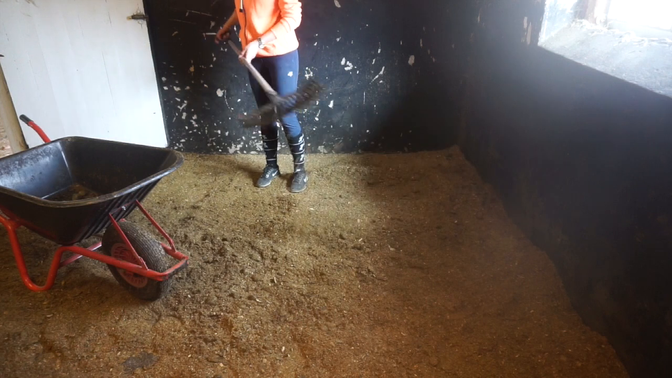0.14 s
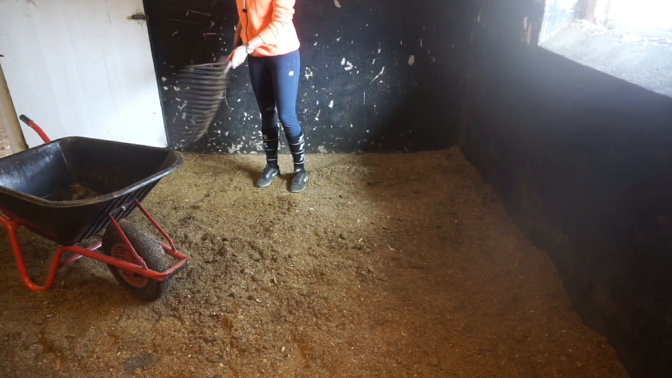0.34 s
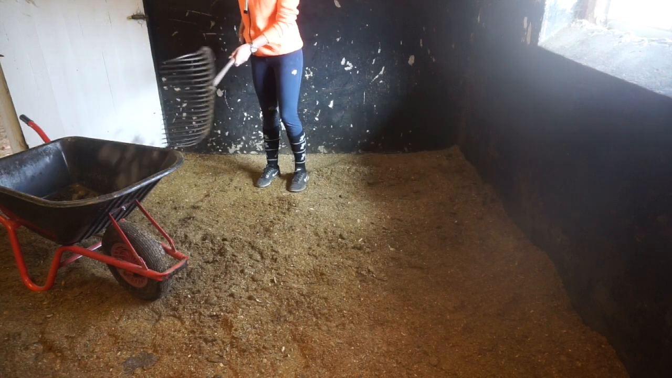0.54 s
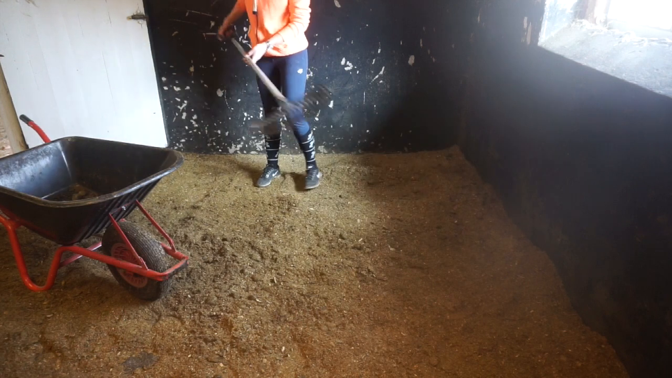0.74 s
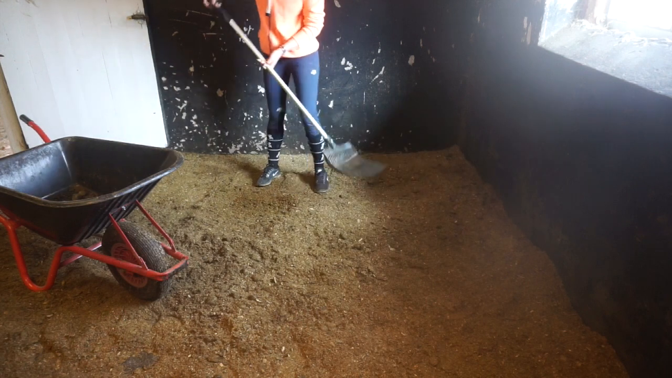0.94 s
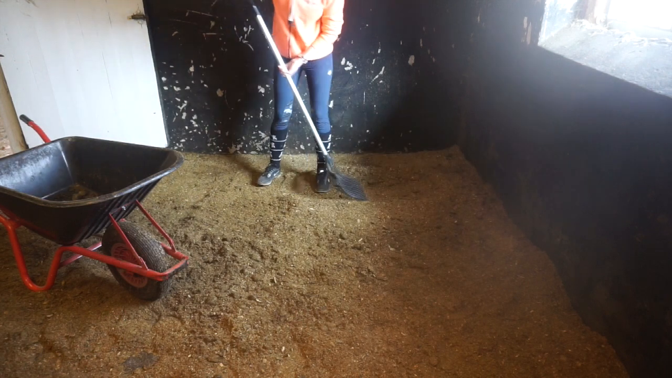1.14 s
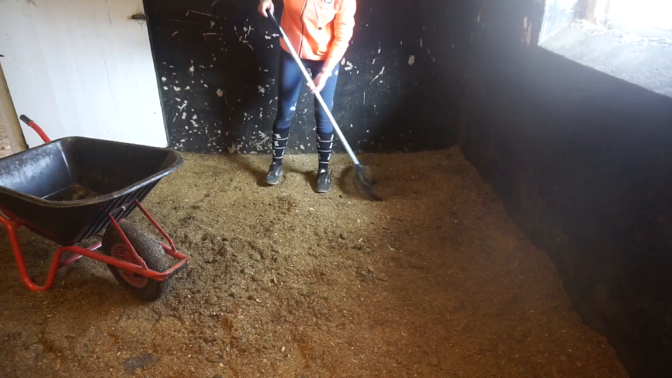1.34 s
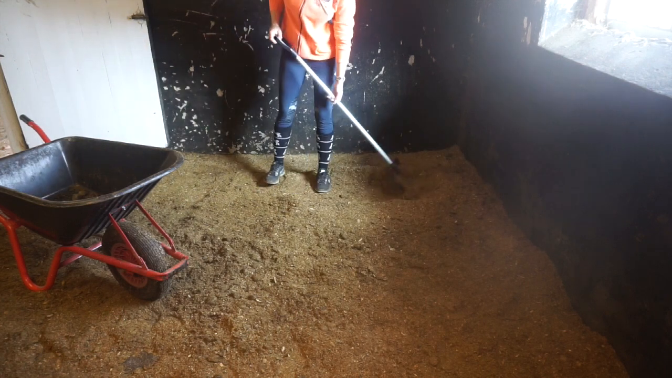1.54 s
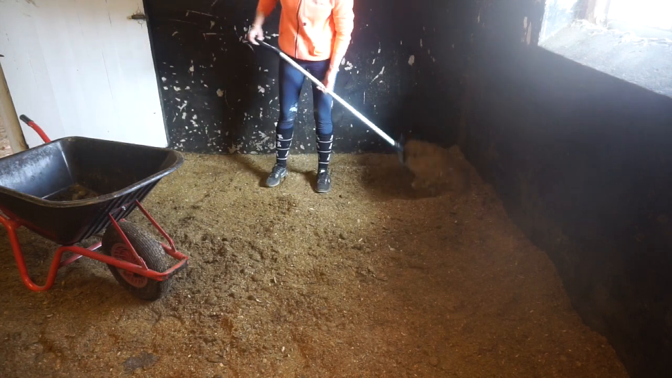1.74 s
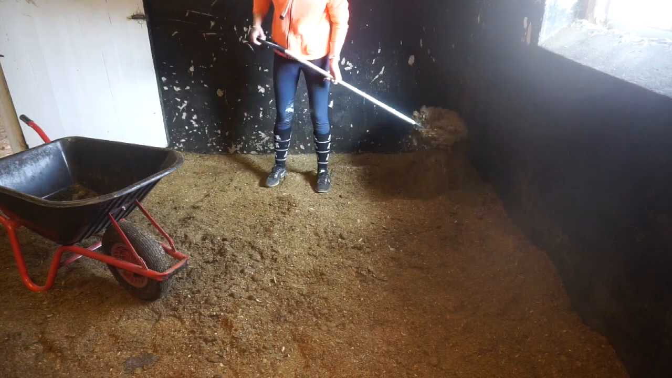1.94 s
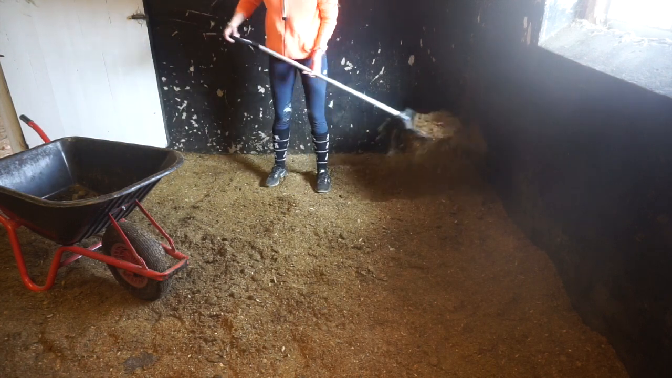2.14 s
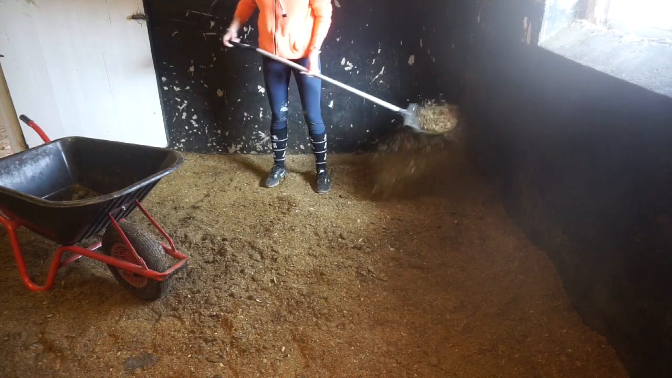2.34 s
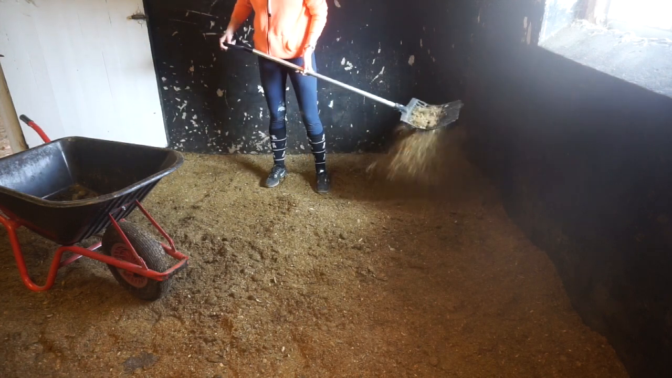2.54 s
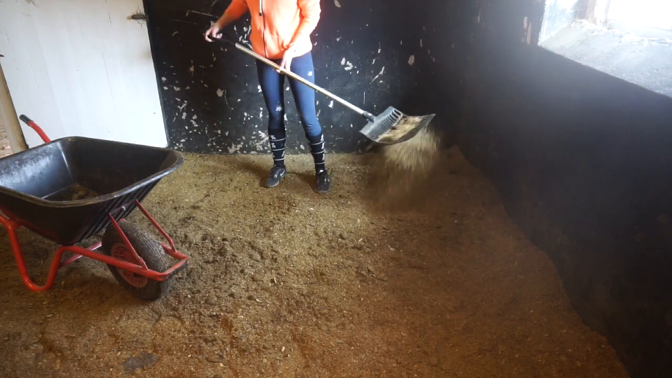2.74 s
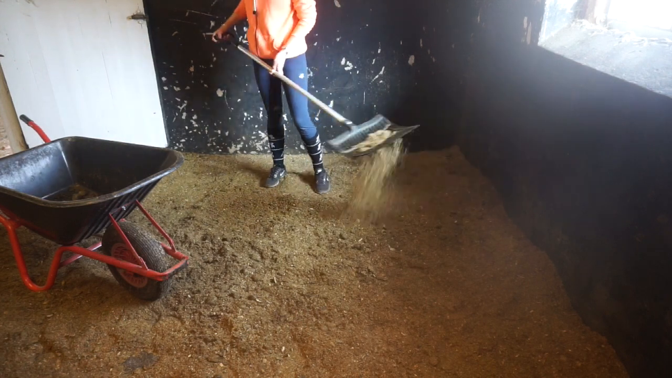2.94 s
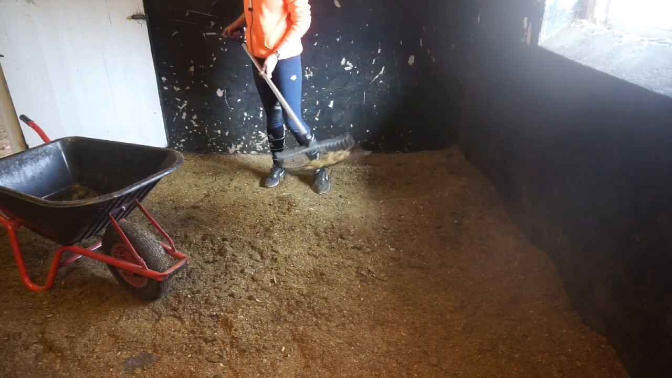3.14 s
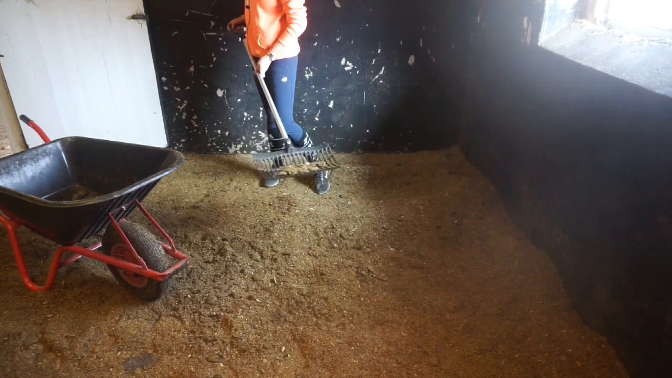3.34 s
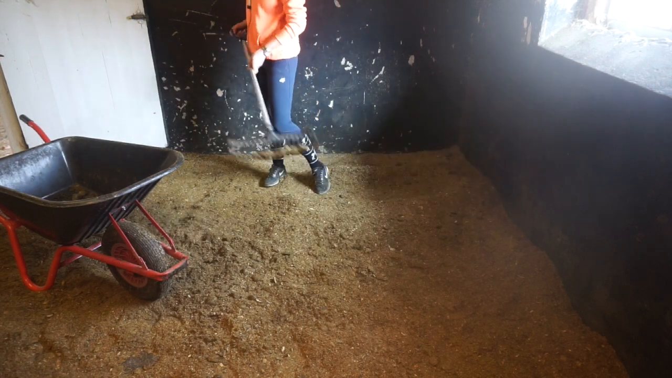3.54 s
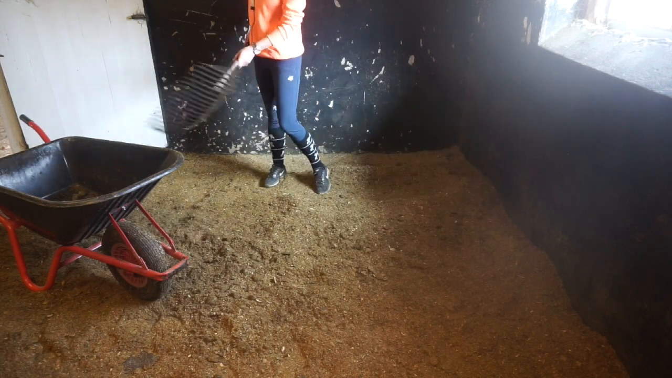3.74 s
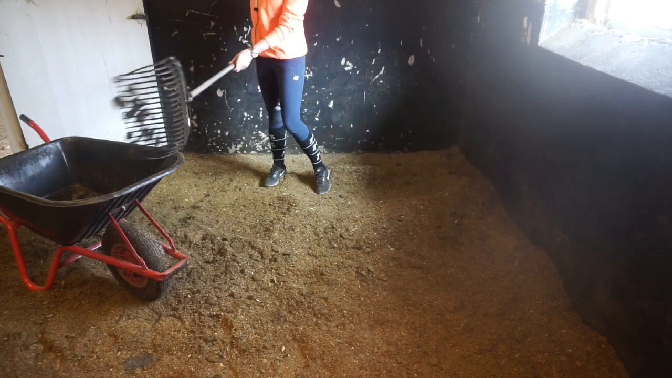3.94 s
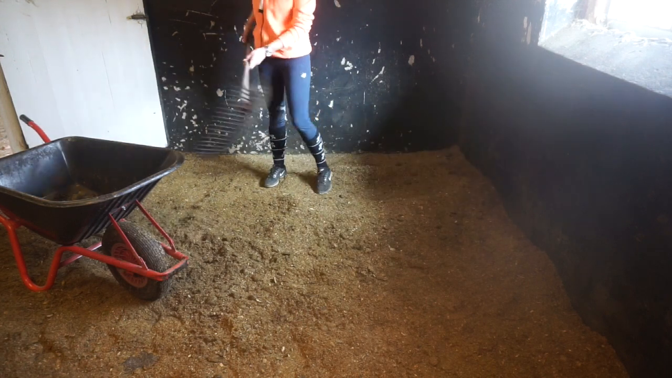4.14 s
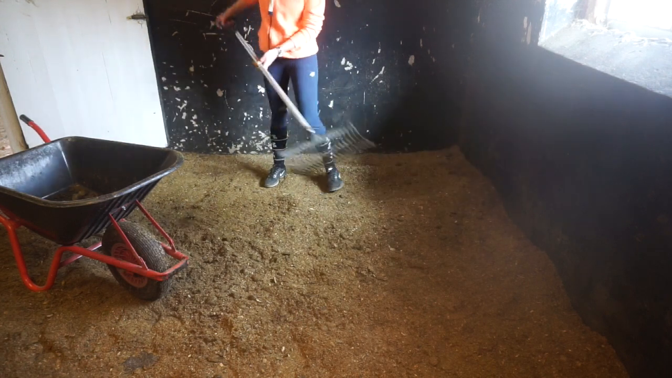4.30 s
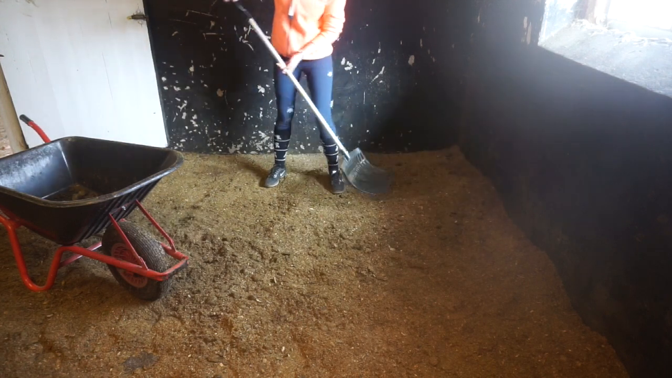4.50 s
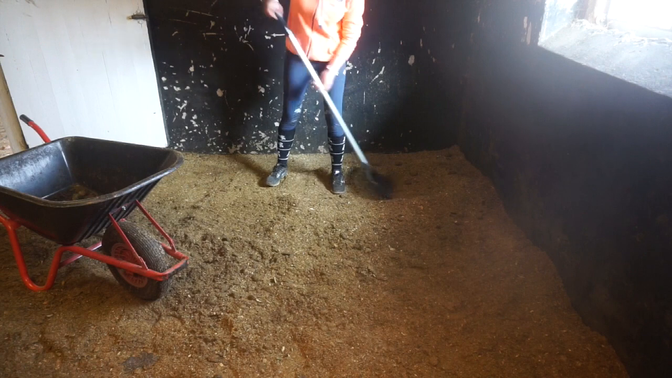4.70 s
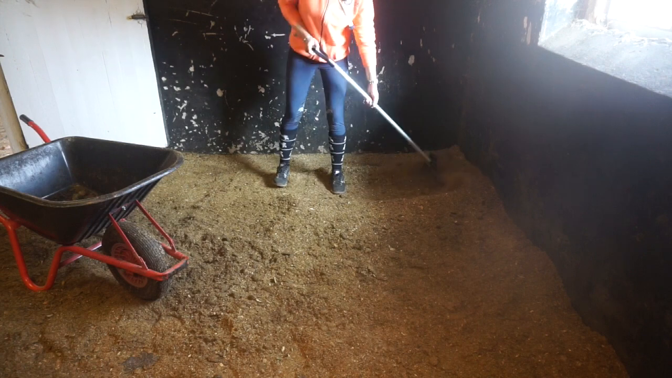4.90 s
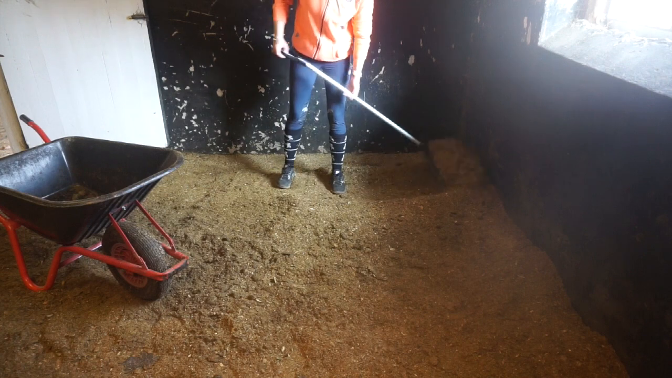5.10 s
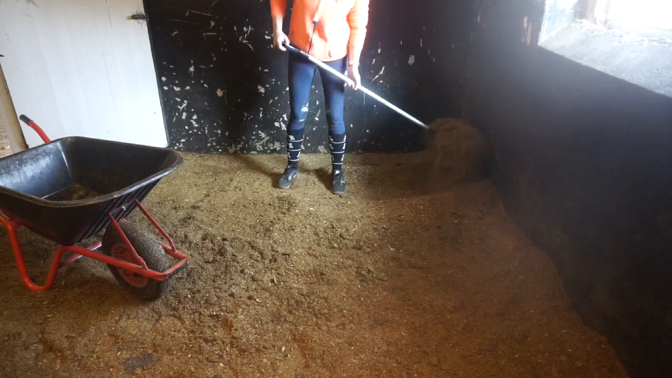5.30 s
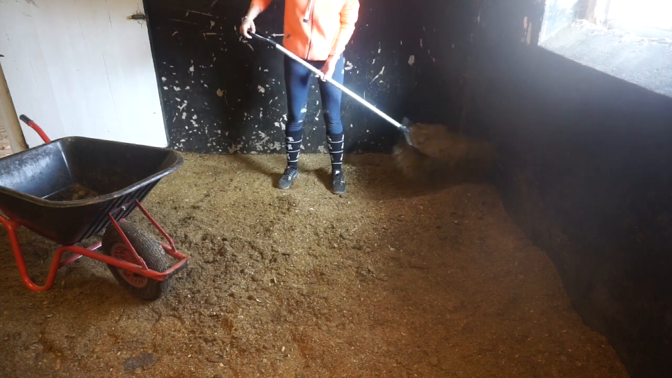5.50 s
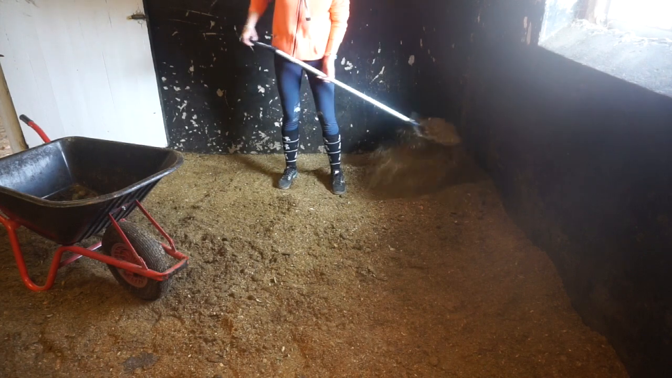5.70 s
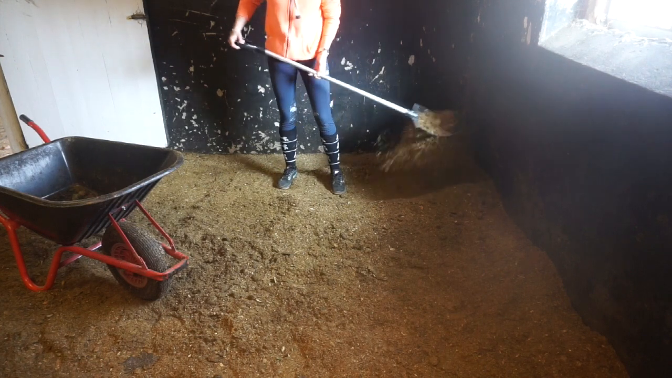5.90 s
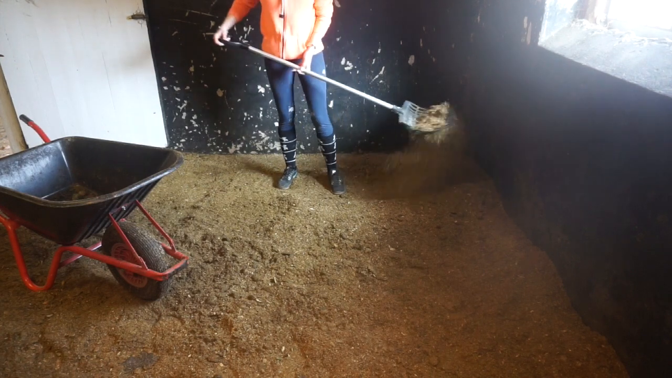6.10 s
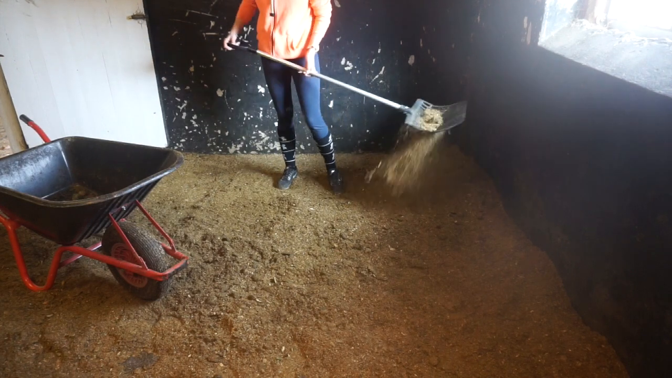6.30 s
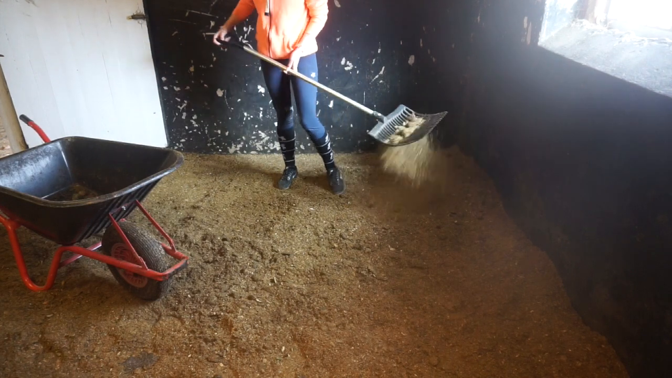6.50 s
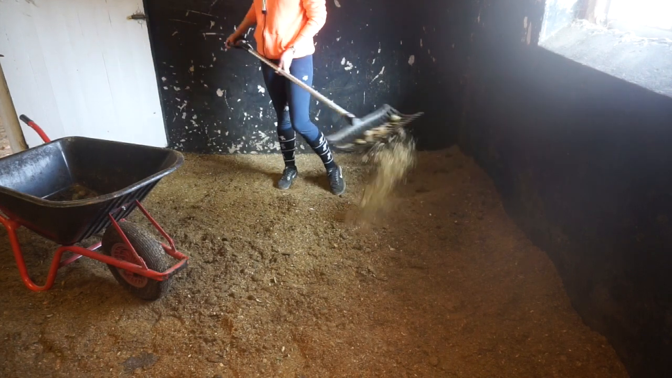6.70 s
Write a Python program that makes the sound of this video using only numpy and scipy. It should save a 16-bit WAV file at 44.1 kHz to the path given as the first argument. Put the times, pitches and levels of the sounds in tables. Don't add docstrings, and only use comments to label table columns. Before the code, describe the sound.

In a bare-walled stall, a load of lumps tumbles into a hollow plastic barrow to the left. The fork then scrapes hard along the mat, and its tines rattle as shavings sift and patter down. A second, heavier load thumps into the barrow, followed by another sharp dig and more shaking. Close stereo pickup from a few metres, short echo, quiet air.

```python
import sys
import numpy as np
from scipy import signal
from scipy.fft import rfft, irfft, next_fast_len
from scipy.io import wavfile
from scipy.ndimage import uniform_filter1d

SR = 44100
rng = np.random.default_rng(int(sys.argv[2]) if len(sys.argv) > 2 else 0)


def log_audio(samples):
    frames = np.atleast_2d(samples).T
    limited = np.clip(frames, -1, 1)
    pcm = np.round(limited * 32767).astype(np.int16)
    wavfile.write(sys.argv[1], SR, pcm)


def magnitude_from_level(level_db):
    exponent = np.asarray(level_db, float) / 20
    return 10 ** exponent


N = 297656
T = np.arange(N) / SR
FFT_SIZE = next_fast_len(N + SR)
FFT_HZ = np.fft.rfftfreq(FFT_SIZE, 1 / SR)
TINES, FLAKES, BEDDING = range(3)
RIM, WALLS, BOTTOM = 1, 2, 3

# (frequency [Hz], density [dB/Hz])
HUSH_COLOUR = [(18, -72), (30, -52), (245, -21), (328, -16.5), (461, -13), (499, -10), (721, -6),
               (801, -6.5), (1250, -6), (2060, -9), (5450, -14), (16000, -21)]
# (frequency [Hz], T60 [s])
STALL_T60 = [(150, 0.88), (600, 0.64), (2500, 0.32), (8000, 0.21)]
# (frequency [Hz], phase [rad])
PORT_PHASE = [(100, -0.54), (1000, 0.98), (3300, -0.65), (5700, -1.57), (7200, -1.48), (9400, -0.079),
              (16000, 1.3)]
# (frequency [Hz], density [dB/Hz])
PATTER_COLOUR = [(1500, -23.5), (3500, -0.5), (6000, -2.5), (9000, -3.5), (13000, -3.5), (16000, -11)]
# (frequency [Hz], density [dB/Hz])
BED_COLOUR = [(120, -31), (250, -4.5), (500, 7), (900, 5), (1500, 2.5), (2500, -21)]
# (frequency [Hz], density [dB/Hz])
RASP_COLOUR = [(400, -28), (700, -9.5), (1200, -4), (1900, -3), (2600, 0), (3300, 0), (4400, -0.5),
               (5200, -6.5), (7000, -10.5), (10000, -13), (14000, -45), (16000, -28)]
# (frequency [Hz], density [dB/Hz])
RATTLE_COLOUR = [(530, -52), (900, -14), (1300, -7), (1650, -5), (2150, -2), (2650, 2), (3100, -2),
                 (3500, -9), (3900, -11.5), (4450, -2), (4950, -10), (6500, -14), (9000, -25.5),
                 (12000, -47)]
# (frequency [Hz], width [Hz], level [dB])
TINE_HUM = [(2350, 100, -22), (2680, 87, -2.5), (3670, 160, 4.5), (4366, 97, 17)]
# (frequency [Hz], width [Hz], level [dB])
TINE_MODES = [(1810, 30, 2), (2203, 235, 8), (2408, 23, 2), (2616, 170, 13), (2700, 120, 10.5),
              (2817, 30, -9), (3164, 270, 6.5), (3670, 65, -3.5), (3860, 71, 0), (4600, 33, -8),
              (4340, 270, 4.5), (5140, 79, -11)]
# (frequency [Hz], width [Hz], level [dB])
RIM_MODES = [(567.5, 42, 2.5), (619, 43, 1.5), (702, 49, -2.5), (796, 91, -5), (874, 30, 0.5),
             (980, 26, -1), (1172, 115, -6), (1335, 76, -5), (1550, 99, -11), (1684, 130, -13.5),
             (1993, 250, -10)]
# (frequency [Hz], width [Hz], level [dB])
WALL_MODES = [(287.5, 18, 5.5), (361, 18.5, 8), (392, 17, 3), (433, 27, 7), (506, 34, 3.5)]
# (frequency [Hz], width [Hz], level [dB])
BOTTOM_MODES = [(97, 25, -6.5), (151, 6.7, 3.5), (186, 14.6, 0), (214, 21, -6.5), (250, 13, -3.5)]

# (time [s], hold [s], tines [dB], flakes [dB], bedding [dB])
DIGS = [
    (1.35, 0.2, -19, -28.5, -33),
    (4.777, 0.12, -14, -25.5, -35.5),
]
# (end [s], rise per 10 dB [s], tines [dB], flakes [dB], bedding [dB])
SWINGS = [
    (0.477, 0.06, -31.5, -46, -40.5),
    (1.344, -0.02, -26.5, -28.5, -47),
    (4.77, 0.25, -43, -63, -63),
    (5.398, 0.2, -52, -62, -61),
]
SHAKES = [(0., 0.11, -43.5, -45), (.12, 0.56, -48.5, -49), (.39, 0.17, -36, -47.5),
          (1.08, 0.03, -40.5, -66), (1.311, 0.1, -36, -43.5), (1.78, 1.2, -49, -56.5),
          (1.95, -0.8, -64, -53), (2.118, 0.2, -38.5, -43.5), (2.254, 0.22, -39.5, -49.5),
          (2.352, 0.2, -38, -61), (2.43, 0.36, -46, -41.5), (2.768, 0.29, -42.5, -41.5),
          (3.05, 0.13, -49.5, -44.5), (3.18, 0.02, -41, -39), (3.328, 0.12, -45.5, -48),
          (3.54, -0.6, -50, -57), (3.86, -0.5, -65, -74), (5.22, 1.8, -54, -67.5), (5.44, 0.12, -36, -44),
          (5.61, 0.17, -40, -48.5), (5.76, 0.26, -42.5, -43.5), (5.95, 0.3, -45, -52),
          (6.064, 0.17, -44.5, -50), (6.2, 0.2, -45.5, -44.5), (6.38, 0.6, -45, -50),
          (6.5, 0.24, -45.5, -43), (6.75, -0.1, -41, -39)]
# (time [s], tines [dB], flakes [dB])
JOLTS = [
    (0.079, -36, -50),
    (1.054, -37.5, -58),
    (3.756, -48, -64),
    (4.61, -43, -61),
    (5.127, -37.5, -49),
    (5.204, -39, -58),
    (5.402, -25.5, -51),
    (6.064, -42, -49.5),
]
# (time [s], bedding [dB])
CLUMPS = [(.05, -50), (1.15, -52), (1.85, -47.5), (2.35, -41), (2.48, -47.5), (2.62, -45), (2.85, -52),
          (3.38, -55), (3.51, -47.5), (3.84, -60), (5.78, -47.5), (6.1, -49), (6.3, -58)]
# (time [s], tines [dB], rim [dB], walls [dB], bottom [dB])
LUMPS = [(0.485, -21, -16.5, -31.5, -30.5), (0.558, -30, -30, -36, -30.5), (0.593, -30, -33, -30.5, -42),
         (.65, -33, -31, -29, -32), (0.71, -34.5, -28, -27.5, -34.5), (0.766, -46, -37, -28.5, -33),
         (.823, -53, -50, -39, -39.5), (.91, -58, -45, -45, -48), (1.003, -65.5, -51, -49, -52),
         (4.017, -27.5, -15.5, -25.5, -27.5), (4.049, -30.5, -18, -25.5, -32),
         (4.099, -30.5, -31, -27, -31), (4.159, -35, -30, -30.5, -30.5), (4.23, -39.5, -35, -38, -40),
         (4.287, -39, -35.5, -43, -52), (4.311, -34, -27, -23.5, -23.5), (4.347, -54, -45, -34, -24),
         (4.373, -57, -48, -26, -44), (4.45, -53.5, -54, -47, -34), (4.6, -52, -58, -59, -44)]
# (tines [s], rim [s], walls [s], bottom [s])
ROLL_S = (0.057, 0.057, 0.043, 0.043)
# (time [s], peak [dB], centre [Hz], crack [dB])
TINE_KNOCKS = [(0.4858, 3, 2520, -37), (0.5174, -14, 2820, -29), (0.5801, -13.5, 2350, -28),
               (1.049, -35, 2650, -19), (1.2605, -33, 2680, -16), (1.297, -38, 2600, -17),
               (1.3498, -3, 3170, -34.5), (1.4581, -9, 2700, -26), (1.5638, -6.5, 2670, -33),
               (2.3486, -33, 2680, -18), (2.7594, -46, 2660, -29), (4.1554, -17, 2090, -31.5),
               (4.4124, -33, 2670, -21), (4.777, 0.5, 2560, -12), (4.8124, -2, 2860, -36),
               (4.9064, -16, 2700, -19), (5.1233, -27.5, 2670, -19.5), (5.2041, -27.5, 3260, -8),
               (5.2404, -33, 4280, -5.5), (5.4016, -12.5, 3700, -1.5), (5.404, -20, 4500, -20),
               (5.5544, -42, 2880, -15), (5.9942, -43, 2600, -2), (6.1144, -29, 2830, -6)]
# (time [s], peak [dB], centre [Hz], crack [dB])
THUDS = [
    (0.494, -6, 543, -35),
    (0.51, -32, 436, -35),
    (0.537, -10.5, 506, -35),
    (4.013, -8.5, 603, -35),
    (4.309, -2.5, 322, -19.5),
    (4.369, -10, 361, -33),
    (4.422, -18.5, 250, -41),
    (5.748, -38.5, 300, -35),
]
# (time [s], peak [dB], centre [Hz], crack [dB])
RAPS = [
    (0.49, -5.5, 1050, -35),
    (0.6624, -21.5, 1380, -17),
    (0.7123, -20.5, 1340, -23),
    (4.0158, -4, 1250, -38),
    (4.02, -8.5, 1960, -38),
    (4.0941, -15, 1150, -36),
    (4.3091, -14, 810, -25),
    (4.6079, -30, 1700, -20),
]

DIG_RISE_S, DIG_FALL_S, DIG_KNEE_S = 0.0014, 0.044, 0.04
BED_RISE_S, BED_FALL_S = 0.013, 0.1
PUSH_DELAY_S, PUSH_DB, PUSH_RISE_S, PUSH_FALL_S = 0.098, -0.5, 0.038, 0.037
SWING_STOP_S = 0.005
SHAKE_RISE_SHARE, SHAKE_BED_DB = 0.4, -11
JOLT_RISE_S, JOLT_FALL_S = 0.0016, 0.016
CLUMP_RISE_S, CLUMP_FALL_S = 0.03, 0.093
LUMP_RISE_S, LUMP_DUST_DB = 0.0028, -22.5
FLAKES_FLOOR_DB = -62


def unit(x):
    return x / np.sqrt(np.mean(x ** 2))


def through(x, response):
    return signal.fftconvolve(x, response)[:N]


def colour(points, size=1024):
    hz, db = np.transpose(points)
    log_hz = np.log(np.maximum(np.fft.rfftfreq(size, 1 / SR), 1))
    spectrum_db = np.interp(log_hz, np.log(hz), db, right=db[-1] - 24)
    cepstrum = irfft(np.log(magnitude_from_level(spectrum_db)))
    cepstrum[1:size // 2] *= 2
    cepstrum[size // 2 + 1:] = 0
    response = irfft(np.exp(rfft(cepstrum)))
    return response / np.linalg.norm(response)


def rings(modes, widen, size=16384):
    t = np.arange(size) / SR
    body = np.zeros(size)
    for k, (hz, width_hz, db) in enumerate(modes):
        fade = np.exp(-np.pi * width_hz * widen * t)
        body += (-1) ** k * magnitude_from_level(db) * width_hz * fade * np.sin(2 * np.pi * hz * t)
    return body / np.linalg.norm(body)


def grains(per_s, spread_db, smooth):
    hit = rng.random(N) < per_s / SR
    size = magnitude_from_level(spread_db * np.minimum(rng.exponential(size=N), 3)) * rng.standard_normal(N)
    return unit(unit(hit * size) + smooth * rng.standard_normal(N))


def flutter(per_s, depth_db):
    span = SR // per_s
    steps = np.repeat(rng.standard_normal(N // span + 1), span)[:N]
    return magnitude_from_level(depth_db * uniform_filter1d(steps, span))


def swell(start, db, rise_s, fall_s, hold_s=0, knee_s=0):
    coarse_t = T[::32]
    since = coarse_t[:, None] - start
    after = np.maximum(since - hold_s, 0)
    climb = -since / np.maximum(rise_s, 1e-4)
    drop = after ** 2 / (after + abs(knee_s) + 1e-9) / np.maximum(fall_s, 1e-4)
    gain = magnitude_from_level(db - 10 * np.maximum(climb, drop))
    return np.interp(T, coarse_t, np.sqrt((gain ** 2).sum(axis=1)))


def handling(part):
    dig, swing, shake, jolt, lump, clump = map(np.transpose, (DIGS, SWINGS, SHAKES, JOLTS, LUMPS, CLUMPS))
    rise_s, fall_s = (BED_RISE_S, BED_FALL_S) if part == BEDDING else (DIG_RISE_S, DIG_FALL_S)
    dig_db = dig[2 + part]
    shake_db = (shake[2], shake[3], shake[2] + SHAKE_BED_DB)[part]
    moves = [swell(dig[0], dig_db, rise_s, fall_s, dig[1], DIG_KNEE_S),
             swell(dig[0] + PUSH_DELAY_S, dig_db + PUSH_DB, PUSH_RISE_S, PUSH_FALL_S),
             swell(swing[0], swing[2 + part], swing[1], SWING_STOP_S),
             swell(shake[0], shake_db, SHAKE_RISE_SHARE * shake[1], shake[1])]
    if part == BEDDING:
        moves.append(swell(clump[0], clump[1], CLUMP_RISE_S, CLUMP_FALL_S))
    else:
        moves.append(swell(lump[0], lump[1] + part * LUMP_DUST_DB, LUMP_RISE_S, ROLL_S[0]))
        moves.append(swell(jolt[0], jolt[1 + part], JOLT_RISE_S, JOLT_FALL_S))
    if part == FLAKES:
        moves.append(magnitude_from_level(FLAKES_FLOOR_DB))
    return np.sqrt(sum(move ** 2 for move in moves))


def rolling(part):
    lump = np.transpose(LUMPS)
    return swell(lump[0], lump[1 + part], LUMP_RISE_S, ROLL_S[part])


def knocks(events, contact_cycles, t60_s, spread, size=4096):
    t = np.arange(size) / SR
    out = np.zeros(N + size)
    modes_hz = np.transpose(BOTTOM_MODES + WALL_MODES + RIM_MODES + TINE_MODES)[0][:, None]
    spot_db = 2.5
    for start_s, peak_db, centre_hz, crack_db in events:
        detune, spot = rng.standard_normal((2, len(modes_hz), 1))
        near = np.exp(-0.5 * (np.log(modes_hz / centre_hz) / spread) ** 2)
        share = np.sign(spot) * magnitude_from_level(spot_db * spot) * near
        fade = np.exp(-np.log(1000) * t / t60_s * (modes_hz / centre_hz) ** 0.43)
        tone = np.sin(2 * np.pi * modes_hz * (1 + 0.013 * detune) * t)
        ring = (share * fade * tone).sum(axis=0)
        ring *= 1 - np.exp(-t * centre_hz / contact_cycles)
        hiss = np.diff(rng.standard_normal(size), 2, prepend=[0, 0]) / 2
        crack = magnitude_from_level(crack_db) * hiss * np.exp(-t / 0.0021)
        first = int(start_s * SR)
        out[first:first + size] += magnitude_from_level(peak_db - 5.5) * (ring / np.abs(ring).max() + crack)
    return out[:N]


def ports(mid, side, side_hz):
    side = signal.lfilter(*signal.butter(1, side_hz, "high", fs=SR), side)
    return np.array([mid + side, mid - side])


def late(x):
    hz, phase_rad = np.transpose(PORT_PHASE)
    turn = np.exp(1j * np.interp(np.log(FFT_HZ + 1), np.log(hz), phase_rad))
    return irfft(rfft(x, FFT_SIZE) * turn, FFT_SIZE)[:N]


def hush():
    mid, side = (through(rng.standard_normal(N), colour(HUSH_COLOUR, size=4096)) for _ in range(2))
    return magnitude_from_level(-50.5) * ports(mid, 1.16 * side, side_hz=250) * flutter(per_s=4, depth_db=-1.3)


def stall(dry, size=4096):
    t = np.arange(4 * size) / SR
    hz, t60_s = np.transpose(STALL_T60)
    low_hz = 60 * 2. ** np.arange(8)
    bands = []
    for low in low_hz:
        octave = signal.butter(2, [low, 2 * low], "band", fs=SR, output="sos")
        bands.append(signal.sosfilt(octave, rng.standard_normal(SR * 2)))
    bands = np.array(bands)
    band_t60_s = np.interp(np.log(low_hz * 1.4), np.log(hz), t60_s)
    fade = np.exp(-np.log(1000) * t / band_t60_s[:, None])
    tilt_db = 1.5 * np.arange(8)
    fade *= magnitude_from_level(tilt_db)[:, None] * (1 - np.exp(-t / 0.0047))
    out = np.zeros((2, N + 8 * size))
    window = signal.get_window("hann", size)
    padded = np.pad(dry, size)
    for start in range(0, N + size, size // 2):
        moment = padded[start:start + size] * window
        for port, pick in enumerate(rng.integers(0, SR, 2)):
            echo = (bands[:, pick:pick + len(t)] * fade).sum(axis=0)
            part = signal.fftconvolve(moment, echo / np.linalg.norm(echo))
            out[port, start:start + len(part)] += part
    return ports(*out[:, size:size + N], side_hz=1460)


def flakes():
    fall = grains(per_s=4000, spread_db=4.0, smooth=1.0) * flutter(per_s=25, depth_db=0.74)
    return through(fall * handling(FLAKES), colour(PATTER_COLOUR))


def shavings():
    bed = grains(per_s=500, spread_db=-2.5, smooth=1.0) * flutter(per_s=18, depth_db=0.5)
    return magnitude_from_level(-4.5) * through(bed * handling(BEDDING), colour(BED_COLOUR))


def barrow():
    lumps = grains(per_s=400, spread_db=4.0, smooth=1.0)
    rim = through(lumps * rolling(RIM), rings(RIM_MODES, widen=1))
    walls = through(lumps * rolling(WALLS), rings(WALL_MODES, widen=1.26))
    bottom = through(lumps * rolling(BOTTOM), rings(BOTTOM_MODES, widen=1.15))
    thuds = knocks(THUDS, contact_cycles=1.0, t60_s=0.094, spread=0.27)
    raps = knocks(RAPS, contact_cycles=2.7, t60_s=0.05, spread=0.2)
    return magnitude_from_level(-2) * (rim + walls + bottom) + thuds + raps


def tine_knocks():
    return knocks(TINE_KNOCKS, contact_cycles=2.5, t60_s=0.034, spread=0.16)


def fork():
    force = handling(TINES)
    drag_db = -26.5
    drag = force ** 2 / (force ** 2 + magnitude_from_level(2 * drag_db))
    rub = grains(per_s=4000, spread_db=1.5, smooth=0.76) * flutter(per_s=60, depth_db=2.5) * force
    rasp = through(rub * np.sqrt(drag), colour(RASP_COLOUR))
    hum = magnitude_from_level(-8) * rings(TINE_HUM, widen=0.99, size=4096)
    head = colour(RATTLE_COLOUR, size=4096) + hum
    rattle = through(rub * np.sqrt(1 - drag), head)
    return magnitude_from_level(-1.0) * rasp + magnitude_from_level(-2.0) * rattle


def scene():
    work = fork() + shavings() + magnitude_from_level(2.5) * flakes() + tine_knocks()
    tub = barrow()
    broad_head = ports(0, fork(), side_hz=3500)[0]
    wide = magnitude_from_level(-3.5) * flakes() + magnitude_from_level(-3.0) * broad_head
    pan_db = 2.5
    left = work + magnitude_from_level(pan_db / 2) * tub
    right = work + magnitude_from_level(-pan_db / 2) * tub
    direct = magnitude_from_level(-2.5) * np.array([late(left) + wide, right - wide])
    return direct + magnitude_from_level(-9) * stall(work + tub) + hush()


def roll_off(x):
    return signal.sosfilt(signal.butter(12, 17020, fs=SR, output="sos"), x)


def record(dry):
    rounded = np.tanh(0.8 * dry) / 0.78
    thin = signal.sosfilt(signal.butter(5, 138, "high", fs=SR, output="sos"), rounded)
    thin = signal.sosfilt(signal.ellip(8, 0.3, 60, 15800, fs=SR, output="sos"), thin)
    self_noise = signal.lfilter(*signal.butter(1, [40, 120], "band", fs=SR), rng.standard_normal(dry.shape))
    return roll_off(thin + magnitude_from_level(-58.0) * self_noise)


dry = scene()
out = record(dry)
log_audio(out)
```